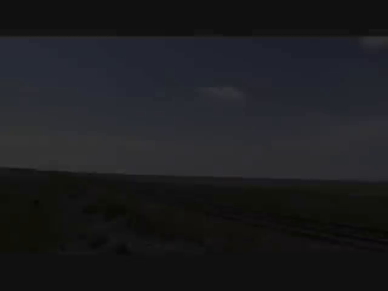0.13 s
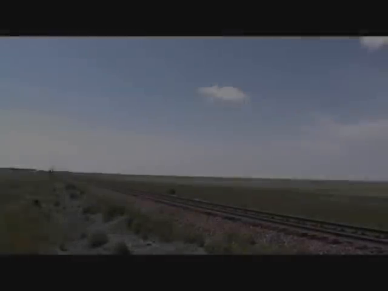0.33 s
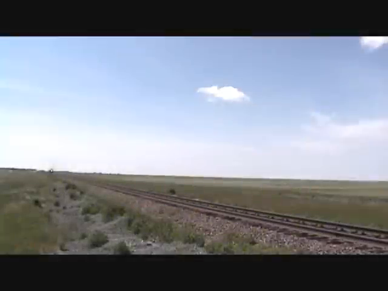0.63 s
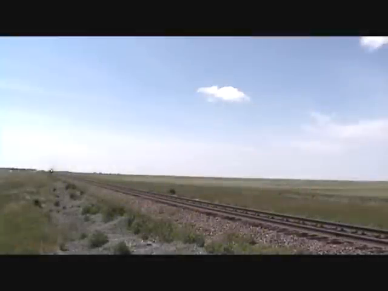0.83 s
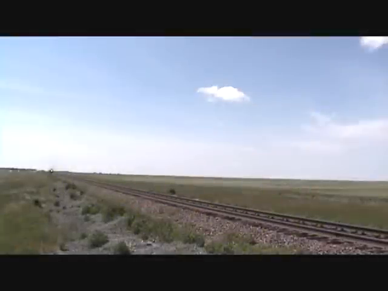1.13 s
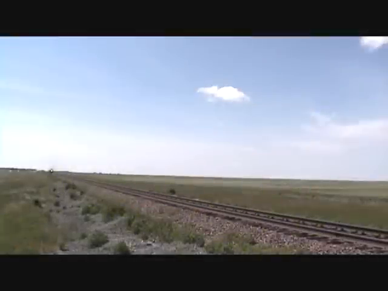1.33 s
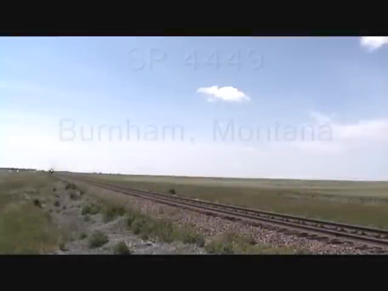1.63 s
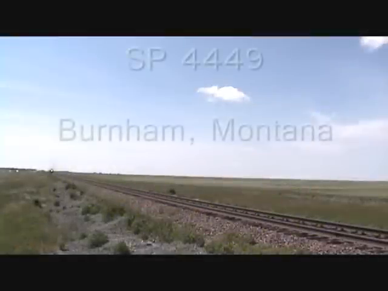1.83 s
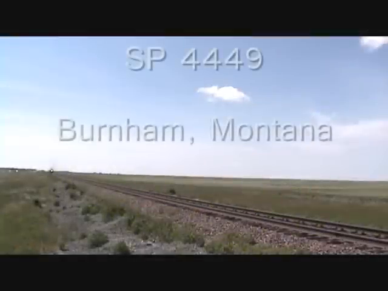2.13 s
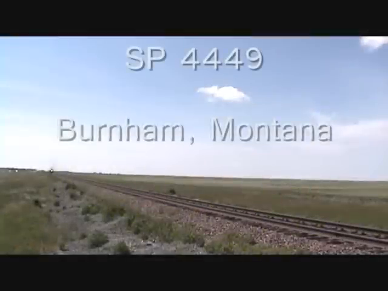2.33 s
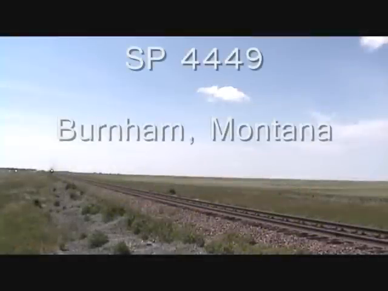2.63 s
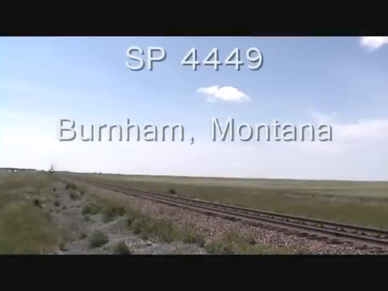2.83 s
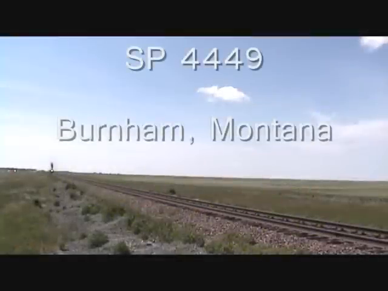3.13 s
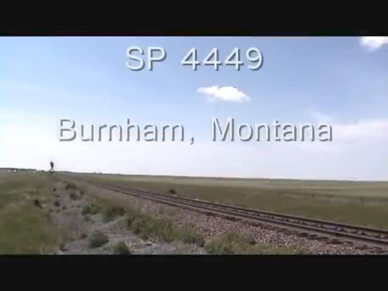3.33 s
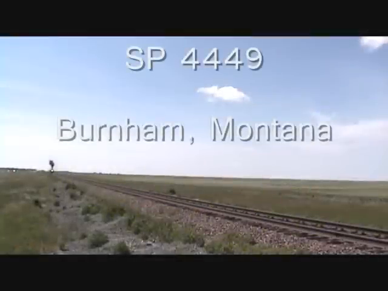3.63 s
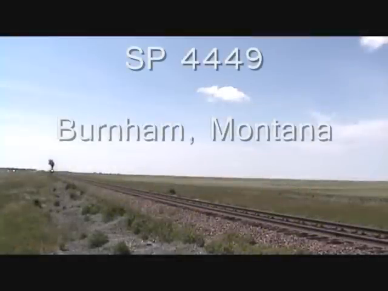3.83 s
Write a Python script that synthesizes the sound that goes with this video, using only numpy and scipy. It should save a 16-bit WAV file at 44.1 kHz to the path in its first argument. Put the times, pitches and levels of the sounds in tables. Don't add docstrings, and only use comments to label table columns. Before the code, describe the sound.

Distant steam locomotive chuffs rapidly and steadily across an open plain, fading up from silence

```python
import sys
import numpy as np
from scipy import signal
from scipy.fft import rfft, irfft
from scipy.io import wavfile
from scipy.ndimage import uniform_filter1d

SR = 44100
rng = np.random.default_rng(int(sys.argv[2]) if len(sys.argv) > 2 else 0)


def invert_db(level):
    return 10 ** (np.asarray(level, dtype=float) / 20)


def materialize(psi):
    bounded = np.clip(np.atleast_2d(psi).T, -1, 1)
    quanta = np.round(bounded * 32767).astype(np.int16)
    wavfile.write(sys.argv[1], SR, quanta)


N = 176400
TIME = np.arange(N) / SR
HZ = np.fft.rfftfreq(N, 1 / SR)


def curve(table):
    a = np.array(table, float)
    return np.interp(np.log(HZ + 1), np.log(a[:, 0]), a[:, 1])


def over_time(table):
    return np.interp(TIME, *np.array(table, float).T)


def colour(x, gain):
    return irfft(rfft(x) * gain, N)


def level(x, db):
    return x * invert_db(db) / np.sqrt(np.mean(x ** 2))


def bump(hz, width):
    return np.exp(-0.5 * ((HZ - hz) / (0.5 * width)) ** 2)


def walk(rate):
    hold = int(SR / rate)
    steps = np.repeat(rng.standard_normal(400)[:N // hold + 1], hold)
    slewed = uniform_filter1d(uniform_filter1d(steps, hold), hold)
    return 1.3 * slewed[:N]


def pair(like):
    mid, side = rfft(rng.standard_normal((2, N)))
    like = np.clip(like, 0, 1)
    opposite = np.array([[1], [-1]])
    return irfft(mid * np.sqrt(1 + like) + side * np.sqrt(1 - like) * opposite, N)


# [f/Hz, level/dB per Hz]
HISS_SPECTRUM = [(3240, -22), (5500, -3.5), (6200, -7), (9130, -1.5), (12700, -1.5), (13500, -5.5)]
# [f/Hz, likeness 0-1]
HISS_LIKENESS = [(5000, 0.37), (8000, 0.58), (11000, 0.81), (15000, 0.43)]


def hiss():
    low_cut = np.sqrt(1 + (4500 / (HZ + 1)) ** 6)
    air = colour(pair(curve(HISS_LIKENESS)), invert_db(curve(HISS_SPECTRUM)) / low_cut)
    swell_db = 0.4 * walk(3.26) + 0.34 * walk(9)
    return level(air * invert_db(swell_db), -61.5)


# [f/Hz, width/Hz, level/dB]
MOTOR_TONES = [(7364, 8, -84), (13915, 50, -79), (13990, 150, -76), (14180, 260, -76), (14500, 260, -78),
               (14664, 10, -84), (14966, 20, -81), (14950, 450, -76)]
# [t/s, level/dB]
MOTOR_LOAD = [(0, 0.5), (1, -1), (1.4, -0.5), (2, 0), (2.3, 5), (2.5, -1), (2.63, 0.5), (2.95, -4),
              (3.3, 0.5), (3.7, 3), (3.9, -3)]


def whine():
    tones = 0
    for hz, width, db in MOTOR_TONES:
        tone = level(colour(pair(1.0), bump(hz, width)), db)
        tones = tones + tone * invert_db(2.0 * walk(5.5))
    return tones * invert_db(over_time(MOTOR_LOAD))


# [f/Hz, level/dB per Hz]
RUMBLE_SPECTRUM = [(20, -38), (45, -24), (68, -9.5), (84, -5.5), (101, 0.5), (125, -10.5), (170, -18.5),
                   (300, -29.5)]
# [t/s, level/dB]
FIREBOX_DRAUGHT = [(.1, -3), (.4, 1.5), (.7, -2.5), (1.0, 0.5), (1.4, -1.5), (1.7, -0.5), (2.05, 0.5),
                   (2.3, -2), (2.55, 2.5), (2.8, 2), (3.1, -2.5), (3.45, 4), (3.6, 0), (3.75, -0.5), (4, 0)]


def rumble():
    below_400 = HZ < 400
    drone = colour(pair(0.9), invert_db(curve(RUMBLE_SPECTRUM)) * below_400)
    swell_db = over_time(FIREBOX_DRAUGHT) + 0.8 * walk(9)
    return level(drone * invert_db(swell_db), -40.5)


# [start t/s, length t/s, level/dB]
PORT_GUSTS = [
    (2.55, 0.77, -44),
    (2.66, .1, -45),
    (3.3, 0.13, -55),
    (3.618, 0.35, -46),
    (2.85, .2, -49),
]
# [f/Hz, level/dB per Hz]
BUFFET_SPECTRUM = [(25, -20), (50, -3), (90, 12), (140, -4), (220, -3), (320, -20), (600, -45.5)]


def wind():
    strength = 0
    for start, length, db in PORT_GUSTS:
        strength = strength + invert_db(db) * np.sin(np.pi * np.clip((TIME - start) / length, 0, 1))
    buffet = level(colour(rng.standard_normal(N), invert_db(curve(BUFFET_SPECTRUM))), 0)
    flutter_db = 4.5 * walk(14)
    return buffet * invert_db(flutter_db) * strength * np.array([[1], [-1]])


# [f/Hz, level/dB per Hz]
TICK_SPECTRUM = [(3500, -16), (5300, -0.5), (6500, -6), (8200, -2), (10500, -10.5), (15000, -14)]


def tick():
    start_s, hold_s, t60_s = 3.4975, 0.002, 0.014
    tail_db, tail_t60_s = -23, 0.11
    since = np.maximum(TIME - start_s, 0)
    snap = invert_db(-60 * np.maximum(since - hold_s, 0) / t60_s)
    ring = invert_db(tail_db - 60 * since / tail_t60_s)
    noise = level(colour(pair(0.8), invert_db(curve(TICK_SPECTRUM))), -42.5)
    return noise * (since > 0) * (snap + ring)


# [t/s, level/dB, bass level/dB, treble level/dB]
BLASTS = [(0.243, 7, -7, -9.5), (0.385, 3.5, -4, -6.5), (0.513, 2.0, -5.5, -6), (0.647, 0.9, -5, -4.5),
          (0.787, 2.3, -2, 1), (0.919, 1.7, -3.5, 0.5), (1.051, -1, -2.5, -2), (1.185, -1, -4.5, -0.4),
          (1.317, 0.8, -2, 0.9), (1.457, -0.4, -2, -0.2), (1.579, -3, -5, 1), (1.719, -5.5, 2.5, 4),
          (1.849, -1.4, 0.2, 5), (1.983, -1.8, 2.0, 4), (2.109, -2.3, 4, 6), (2.243, -1, 1.5, 2),
          (2.377, 1.5, -1, 0.2), (2.511, -0.3, 3.5, 1.5), (2.637, -1.1, 0.9, 1), (2.773, 2, -1.2, -2.7),
          (2.907, 3, 0, -3), (3.037, 1, 1, -3.5), (3.163, -3, 1.5, -1.4), (3.289, -3, 3, 0.7),
          (3.423, -0.2, 3.4, -0.3), (3.559, 0, 2.5, -3.2), (3.683, -0.5, -1.7, -5), (3.809, -2.5, 3, -2.1),
          (3.945, 0.8, 2, 0)]
# [t/s, level/dB, bass level/dB, treble level/dB]
FIRST_BLAST = (.114, 2, -5, -5.5)
# [f/Hz, level/dB per Hz]
JET_SPECTRUM = [(120, -21), (250, -5.5), (700, -3.5), (1600, -2), (2800, -5.5), (3600, -12), (4500, -23),
                (5600, -38.5)]
# [f/Hz, width/Hz, level/dB]
CHIMNEY_AND_GROUND = [(335, 22.4, 5), (424, 57.4, 11.5), (510.4, 38.4, -10), (625, 74, -1), (735, 51, 4.5),
                      (811, 41, 4), (669, 37, 3.5), (1340, 30, 1.5), (1059, 43, 6), (1526, 66, 5),
                      (1918, 85, 2.5), (980, 170, -1), (1700, 130, -1.5)]


def locomotive():
    rise_s, hold_s, fall_db_per_s, lead_s = 0.017, 0.033, 168, 0.0055
    between_db, between_tilt_db = -11, -1.8
    turbulence_db, patch_db = 1.5, 2.0
    treble_octave = 1.68
    port_unlike_db = -16

    rows = np.array([FIRST_BLAST] + list(BLASTS))
    blast_power = np.zeros(N)
    for start, db in rows[:, :2]:
        since = TIME - start + lead_s
        swell = np.sin(np.pi / 2 * np.clip(since / rise_s, 0, 1))
        fall_db = fall_db_per_s * np.maximum(since - rise_s - hold_s, 0)
        blast_power += (swell * invert_db(db - fall_db)) ** 2
    bass_db = np.interp(TIME, rows[:, 0] + hold_s, rows[:, 2])
    treble_db = np.interp(TIME, rows[:, 0] + hold_s, rows[:, 3])

    turbulence = invert_db(turbulence_db * walk(45.1))
    noise = rfft(rng.standard_normal((2, N)))
    octaves = np.log2(HZ / 1000 + 1e-9)
    jet = 0
    for octave in np.arange(-3, 2.8, 1 / 3):
        band = np.cos(np.pi / 2 * np.clip(3 * (octaves - octave), -1, 1)) ** 2
        bass_part = np.clip(0.5 - octave, 0, 1)
        treble_part = 1.33 * np.exp(-((octave - treble_octave) / 0.65) ** 2)
        air_db = bass_db * bass_part + treble_db * treble_part
        steady = invert_db(between_db + between_tilt_db * octave)
        steam = np.sqrt(blast_power + steady ** 2)
        jet = jet + irfft(noise * band, N) * (steam * invert_db(air_db + patch_db * walk(4.99)))

    both = np.array([jet[0], jet[0] + invert_db(port_unlike_db) * jet[1]])
    path_db = curve(JET_SPECTRUM)
    for hz, width, db in CHIMNEY_AND_GROUND:
        path_db = path_db + db * bump(hz, width)
    return level(colour(both * turbulence, invert_db(path_db)), -38.5)


# [f/Hz, level/dB]
PORT_LEVEL = [(60, 1), (110, -3), (200, 0.5), (380, -1.5), (700, 1.0), (1290, 3.5), (2380, 5.5), (4400, 1),
              (8120, 0), (15000, -6)]
# [f/Hz, phase/rad]
PORT_LEAD = [(60, 0.034), (500, 0.38), (1290, 0.62), (1810, .1), (2930, .02), (8200, .1), (10900, 1.3),
             (12200, 2.3)]


def ports(x):
    half = invert_db(curve(PORT_LEVEL) / 2) * np.exp(0.5j * curve(PORT_LEAD))
    return colour(x, np.array([half, 1 / half]))


def scene():
    return ports(locomotive() + rumble() + hiss()) + whine() + tick() + wind()


def drum_notches(x):
    drum_hz, width_hz = 300, 22.4
    groups = [(-9.5, range(2, 17, 2)), (-10, [3, 7, 9, 11, 13]), (-9, range(18, 46, 2))]  # dB, harmonics
    dips_db = sum(db * bump(drum_hz * k, width_hz) for db, harmonics in groups for k in harmonics)
    return colour(x, invert_db(dips_db))


def fade_in():
    frame_s, from_s, to_s = 1001 / 30000, 0.122, 1.92
    first_step, bend = 0.12, 1.007
    frames = np.floor((TIME - from_s) / frame_s)
    ramp = np.clip((frames + first_step) * frame_s / (to_s - from_s), 0, 1)
    return uniform_filter1d((frames >= 0) * ramp ** bend, size=40)


def roll_off(x):
    return signal.sosfilt(signal.butter(12, 15690, fs=SR, output="sos"), x)


def record(dry):
    mix = drum_notches(dry) * fade_in()
    return roll_off(mix)


dry = scene()
out = record(dry)
materialize(out)
```